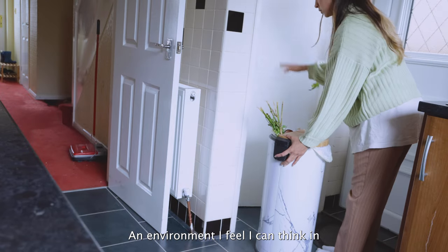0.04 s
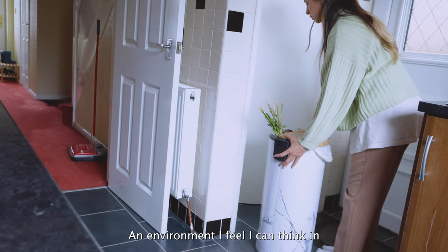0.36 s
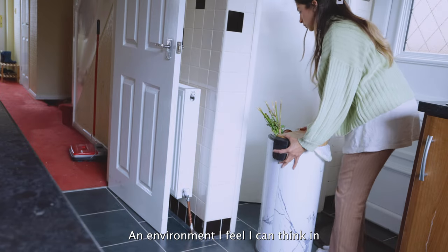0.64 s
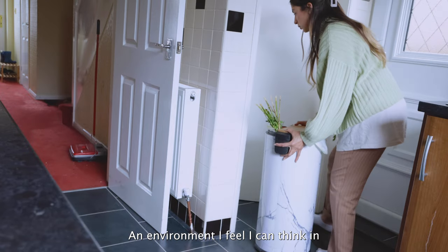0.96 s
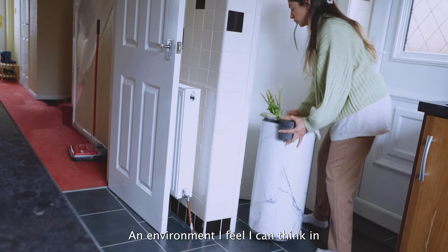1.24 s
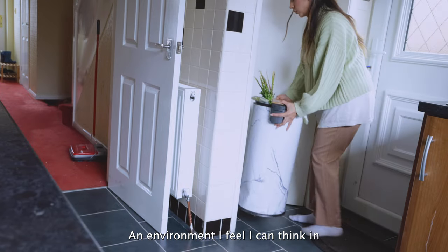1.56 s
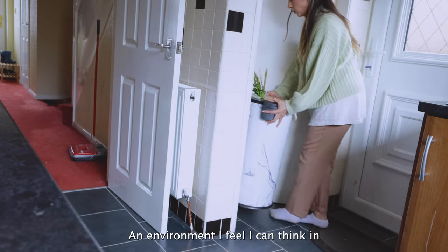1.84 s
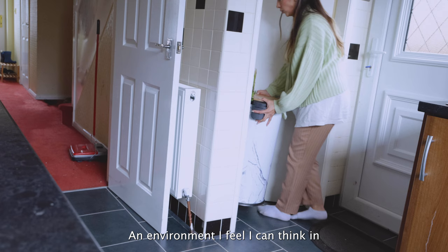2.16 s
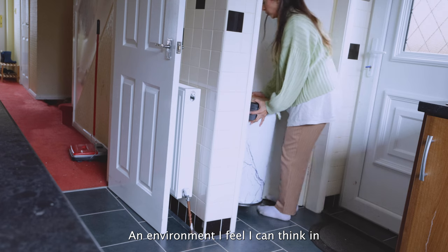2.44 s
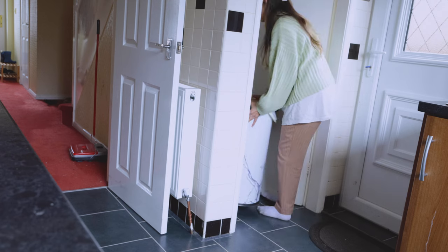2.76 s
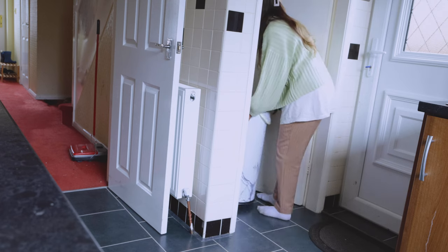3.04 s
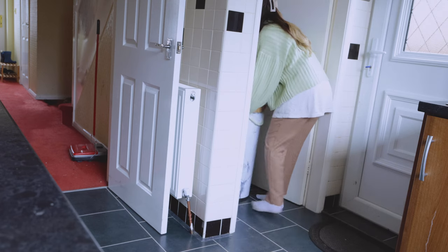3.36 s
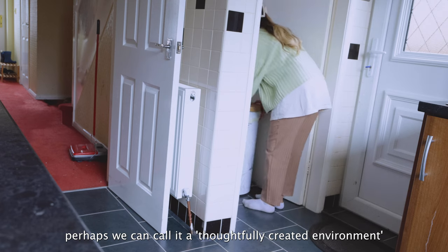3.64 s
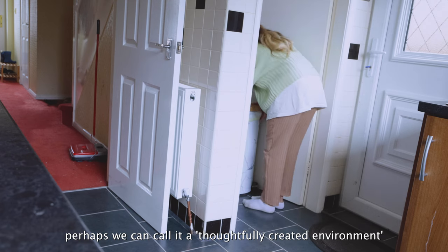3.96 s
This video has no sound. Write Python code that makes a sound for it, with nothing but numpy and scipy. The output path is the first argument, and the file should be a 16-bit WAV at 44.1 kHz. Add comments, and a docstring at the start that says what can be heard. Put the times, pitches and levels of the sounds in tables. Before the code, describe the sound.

A bin is shifted across a tiled floor in a small, echoing room. Feet scuff and the base scrapes lightly, a brief high squeak follows, then the bin knocks down with several hollow thuds over a faint hum.

```python
"""A small, hard-walled room with a tiled floor, across which a tall bin is shifted. Feet scuff and the
base drags (sliding friction), the rim squeaks (stick-slip oscillation), then the bin knocks down in its
corner and gets a last shove, its shell ringing in damped modes. Friction, impacts and footfalls
reverberate between the walls; a low appliance hum and faint room air run underneath."""
import sys
import numpy as np
from scipy import signal
from scipy.fft import rfft, irfft
from scipy.io import wavfile
from scipy.ndimage import uniform_filter1d

SR = 44100
rng = np.random.default_rng(int(sys.argv[2]) if len(sys.argv) > 2 else 0)


def persist_wave(psi):
    """Save psi, clipped to +-1, as 16-bit WAV."""
    counts = np.round(np.clip(psi, -1, 1) * 32767).astype(np.int16)
    wavfile.write(sys.argv[1], SR, np.atleast_2d(counts).T)


N = 176400
T = np.arange(N) / SR

# knocks of the bin (time [s], thud [dB], clack [dB], crack [dB], ring [dB])
BIN_KNOCKS = [(2.552, -29, -52, -68, -41), (3.375, -51, -22, -37, -36), (3.43, -31.5, -26, -48, -40),
              (3.564, -19.5, -33.5, -24.5, -24.5), (3.574, -17.5, -30.5, -36.5, -16),
              (3.675, -40, -39, -38.5, -28), (3.798, -31, -19, -50, -19)]


def knocks(contact_s=0.0092, rattle_s=0.027):
    """Impact excitation: brief forces draw a thud from the body, a clack from the rim, a lid rattle."""
    # spectra of body, rim and lid (frequency [Hz], relative level [dB])
    thud_spectrum = [(40, -26), (150, -19), (290, 3), (400, -6), (520, 0), (800, 0), (1200, -6),
                     (1800, -17.5), (5000, -45), (15000, -56)]
    clack_spectrum = [(40, -43), (180, -11.5), (400, 4.5), (800, 2), (1300, 10), (2200, -0.5), (4000, -3),
                      (6000, -7.5), (7500, -28), (15000, -47)]
    crack_spectrum = [(200, -12), (1500, 3), (3000, 2), (6000, -3), (8500, -1.5), (10500, -13),
                      (15500, -19)]
    times, thud_db, clack_db, crack_db, _ = np.array(BIN_KNOCKS).T
    thud = colour(blows(times, thud_db, contact_s), thud_spectrum)
    clack = colour(blows(times, clack_db, contact_s), clack_spectrum)
    crack = colour(blows(times, crack_db, rattle_s), crack_spectrum)
    return thud + clack + crack


def shell_ringing(gain_db=-12):
    """Free vibration: after each knock the shell's modes, slightly detuned, decay exponentially."""
    # modes of the shell (frequency [Hz], level [dB], 60 dB decay time [s])
    modes = [(159.4, -14.5, 0.62), (175.5, -3.5, 1), (194.5, -15, 0.82), (302, 1, 0.58), (488, 0, 0.39),
             (496, -11, 0.19), (522, -3, .3), (587, -13, 0.35), (783, -0.5, 0.16), (925, -3.5, .3),
             (1068, 0, 0.25), (1216, -17, 0.2)]
    ring = np.zeros(N)
    for time, *_, ring_db in BIN_KNOCKS:
        start = int(time * SR)
        t = T[:N - start]
        detunings = 1 + 0.0082 * rng.standard_normal(len(modes))
        for (hz, mode_db, t60), detune in zip(modes, detunings):
            envelope = undb(ring_db + mode_db + gain_db) * np.exp(-np.log(1000) * t / t60)
            ring[start:] += envelope * np.sin(2 * np.pi * hz * detune * t)
    return ring


def squeak(jitter=0.013, jitter_hz=300):
    """Stick-slip oscillation: the rim grips and lets go at a wavering rate, giving a harmonic series."""
    # course of the squeak (time [s], pitch [Hz], level [dB], spectral tilt [dB/octave])
    course = [(2.724, 2400, -33, -10), (2.75, 2368, -27.5, -9.5), (2.786, 2258, -32, 0),
              (2.832, 2227, -29.5, 1.5), (2.858, 2122, -25.5, 1), (2.888, 2239, -34.5, 1.5),
              (2.924, 2286, -28.5, 1.5), (2.955, 2120, -32.5, 0.5), (2.982, 1977, -24, 2.5),
              (3.006, 1917, -35.5, 6.5), (3.044, 2000, -29, 0.5), (3.082, 2151, -37, -1),
              (3.114, 2186, -49, -3)]
    # harmonics from the fundamental up, before the tilt (relative level [dB])
    harmonics_db = [0.5, -3, -7.5, -14, -22, -23, -26, -27]
    times, hz, level_db, tilts = np.array(course).T
    pitch = np.interp(T, times, hz) * (1 + jitter * walk(jitter_hz))
    phase = 2 * np.pi * np.cumsum(pitch) / SR
    tilt = np.interp(T, times, tilts)
    gains = [undb(db + tilt * np.log2(k)) for k, db in enumerate(harmonics_db, 1)]
    tone = sum(gain * np.sin(k * phase) for k, gain in enumerate(gains, 1))
    tone_rms = np.sqrt(sum(gain ** 2 for gain in gains) / 2)
    envelope = undb(np.interp(T, times, level_db)) * (T > times[0]) * (T < times[-1])
    return envelope * tone / tone_rms


def slides():
    """Forced vibration: friction grates the base on the tiles and drives a rumble in the hollow body."""
    # drags of the base (start [s], length [s], rise [s], release [s], rumble [dB], grating [dB])
    drags = [(0.675, 0.099, 0.023, 0.025, -47.5, -51), (0.894, 0.108, 0.045, 0.015, -50, -45),
             (2.491, 0.17, 0.038, .02, -41, -44.5), (2.604, 0.084, 0.016, 0.078, -33.5, -59),
             (2.685, 0.16, 0.12, 0.015, -41, -37), (3.567, .11, 0.014, 0.14, -35.5, -36),
             (3.771, 0.082, 0.025, 0.051, -27, -23)]
    # spectra of body and base (frequency [Hz], relative level [dB])
    rumble_spectrum = [(30, -24), (60, -10), (120, -11), (175, 3.5), (250, -7), (340, 0), (750, -2),
                       (1100, -8), (1800, -13.5), (3500, -9), (15000, -54.5)]
    grating_spectrum = [(100, -7.5), (600, -4), (1100, -1), (1600, 2.5), (3000, -2), (4500, -0.5),
                        (6200, -3), (7200, -8), (9000, -10), (10500, -17), (15500, -20)]
    rumble, grating = 0, 0
    for start, length, rise, release, rumble_db, grating_db in drags:
        speed = np.clip((T - start) / rise, 0, 1) * np.exp(-np.maximum(T - start - length, 0) / release)
        rumble += undb(rumble_db) * speed
        grating += undb(grating_db) * speed
    return sum(colour(envelope * friction(grain_db=3.5, judder_db=4.5), spectrum)
               for envelope, spectrum in ((rumble, rumble_spectrum), (grating, grating_spectrum)))


def scuffs():
    """Friction noise follows sliding speed: a light hiss, and a rasp when weight bears on the contact."""
    # soles and bin brushing the tiles (peak time [s], rise [s], fall [s], hiss [dB], rasp [dB])
    strokes = [(.17, 0.16, 0.056, -70, -73), (0.514, 0.047, 0.039, -40, -57),
               (0.688, 0.11, 0.11, -39, -47.5), (.775, 0.011, 0.032, -58, -44),
               (.962, 0.062, 0.055, -37, -35), (1.026, 0.0097, 0.02, -40, -30),
               (1.40, 0.14, 0.087, -53.5, -64), (1.96, 0.054, 0.015, -65, -63),
               (2.302, 0.032, 0.025, -46.5, -48), (2.625, 0.024, 0.029, -43, -65),
               (2.847, 0.016, 0.026, -35, -40), (3.30, 0.017, 0.087, -59, -68),
               (3.55, 0.018, 0.017, -48.5, -44)]
    # spectra of light and loaded contact (frequency [Hz], relative level [dB])
    hiss_spectrum = [(200, -6), (1000, -42.5), (2500, -0.5), (5000, 2.5), (7000, 1.5), (9000, 0.5),
                     (10500, -6), (15500, -9.5)]
    rasp_spectrum = [(80, -17), (170, -8.5), (400, -12.5), (700, -4.5), (1000, 1.5), (1700, 6), (2300, 3.5),
                     (3000, -5.5), (5000, -3.5), (15000, -34)]
    hiss, rasp = 0, 0
    for peak, rise, fall, hiss_db, rasp_db in strokes:
        speed = np.exp(-((T - peak) / np.where(T < peak, rise, fall)) ** 2)
        hiss += undb(hiss_db) * speed
        rasp += undb(rasp_db) * speed
    return sum(colour(envelope * friction(grain_db=-0.5, judder_db=5), spectrum)
               for envelope, spectrum in ((hiss, hiss_spectrum), (rasp, rasp_spectrum)))


def feet():
    """Impact noise: long, soft contacts of the feet sound dull; short snaps of grit sound bright."""
    # heavy footfalls, and grit snapping under the load (time [s], level [dB])
    footfalls = [(0.701, -49), (2.162, -40.5), (2.585, -38.5), (2.703, -36.5), (3.406, -25.5),
                 (3.611, -26.5), (3.795, -19.5)]
    grit_snaps = [(0.77, -34), (1.408, -40.5), (2.279, -46), (2.504, -46.5), (2.611, -40), (3.117, -53)]
    # their spectra (frequency [Hz], relative level [dB])
    footfall_spectrum = [(25, -25), (60, 1), (110, -14), (175, -3.5), (240, -14.5), (600, -29.5),
                         (4000, -42)]
    grit_spectrum = [(200, -26), (1000, -22), (2000, -8), (3000, 4.5), (4500, 6.5), (5600, 3),
                     (7000, -11.5), (15000, -26)]
    steps = colour(blows(*np.array(footfalls).T, contact_s=0.021), footfall_spectrum)
    grit = colour(blows(*np.array(grit_snaps).T, contact_s=0.002), grit_spectrum)
    return steps + grit


def friction(grain_db, judder_db, slips_per_s=5900, judder_hz=70):
    """Shot noise: dense micro-slips of uneven size under a juddering pressure."""
    slips = (rng.random(N) < slips_per_s / SR) * np.sign(rng.standard_normal(N))
    sizes = undb(grain_db * np.minimum(rng.exponential(size=N), 5))
    pressure = undb(judder_db * walk(judder_hz))
    return unit(slips * sizes * pressure)


def blows(times, levels_db, contact_s, hold_s=0.01):
    """Contact chatter: decaying noise bursts, each with the energy of its level held for hold_s."""
    force = sum(undb(db) * (T >= time) * np.exp(-np.abs(T - time) / contact_s)
                for time, db in zip(times, levels_db))
    return force * rng.standard_normal(N) * np.sqrt(2 * hold_s / contact_s)


def room(direct, patterns=4, drift_hz=22.098, reverb_db=4):
    """Reflection paths depend on position: a moving source drifts between patterns of reflections."""
    shares = np.array([walk(drift_hz) for _ in range(patterns)])
    shares /= np.linalg.norm(shares, axis=0)
    reverb = sum(signal.fftconvolve(direct * share, room_response())[:N] for share in shares)
    return (direct + undb(reverb_db) * reverb) / np.hypot(1, undb(reverb_db))


def room_response(build_s=0.0031):
    """Diffuse reverberation: dense reflections build up and decay, soonest in the highest treble."""
    # tail from tiles and walls (frequency [Hz], 60 dB decay time [s], relative level [dB])
    tail_bands = [(100, 0.24, -1.5), (400, 0.31, 0.5), (1480, 0.31, 0.5), (3700, 0.33, -1.5),
                  (7650, 0.29, 0), (10200, 0.3, -2.5), (15000, 0.18, -1.5)]
    hz, t60s, db = np.array(tail_bands).T
    t = T[:SR]
    spectrum = rfft(rng.standard_normal(SR))
    log_hz = np.log(np.arange(len(spectrum)) + 1)
    bands = [irfft(spectrum * np.interp(log_hz, np.log(hz), gains)) for gains in np.diag(undb(db))]
    tail = sum(band * np.exp(-np.log(1000) * t / t60) for band, t60 in zip(bands, t60s))
    return unit(tail * (1 - np.exp(-t / build_s))) / np.sqrt(SR)


def appliance_hum(waver_hz=7.2, fundamental_waver_db=0.6, overtone_waver_db=3.5):
    """A line spectrum with amplitude modulation: the lowest line is nearly steady, the others waver."""
    # lines of the hum (frequency [Hz], level [dB])
    lines = [(49.6, -55.5), (103, -61.5), (154, -67.5)]
    hum = 0
    for k, (hz, db) in enumerate(lines):
        waver_db = (overtone_waver_db if k else fundamental_waver_db) * walk(waver_hz)
        hum += undb(db + waver_db) * np.sqrt(2) * np.sin(2 * np.pi * (hz * T + rng.random()))
    return hum


def room_air(level_db=-59):
    """Stationary broadband noise: still room air, strongest in the bass."""
    # spectrum of the air (frequency [Hz], relative level [dB])
    air_spectrum = [(20, -35), (50, -12), (80, 0), (120, -8), (165, 6), (260, -7), (400, -5.5), (725, -7),
                    (1000, -12), (2000, -18.5), (3850, -20), (5700, -20.5), (10000, -26.5), (15500, -29.5)]
    return undb(level_db) * colour(rng.standard_normal(N), air_spectrum)


def colour(x, points, size=8192):
    """Minimum-phase filtering at unit power gain, shaped by (frequency [Hz], level [dB]) points."""
    hz, db = np.array(points).T
    log_hz = np.log(np.arange(size // 2 + 1) * SR / size + 1)
    gain = unit(undb(np.interp(log_hz, np.log(hz), db)))
    cepstrum = irfft(np.log(gain))
    cepstrum[1:size // 2] *= 2  # folding onto positive time makes the filter causal
    cepstrum[size // 2 + 1:] = 0
    return signal.fftconvolve(x, irfft(np.exp(rfft(cepstrum))))[:N]


def walk(rate_hz):
    """Smooth random fluctuation of rms 1."""
    span = max(int(SR / rate_hz), 1)
    stairs = rng.standard_normal(N)[np.arange(N) // span]
    return unit(uniform_filter1d(uniform_filter1d(stairs, span), span))


def undb(db):
    """Decibels to amplitude ratio."""
    return 10 ** (np.asarray(db) / 20)


def unit(x):
    """Normalisation to rms 1."""
    return x / np.sqrt(np.mean(x ** 2))


def scene(floor_db=-2):
    """Superposition: the reverberant floor sounds add to the shell's ring, the hum and the air."""
    floor = room(scuffs() + slides() + squeak() + knocks() + feet())
    return (undb(floor_db) * floor + shell_ringing() + appliance_hum() + room_air())[None]


def record(dry, cutoff_hz=15800):
    """Band limiting: a steep low-pass removes the highest treble."""
    return signal.sosfilt(signal.ellip(10, .2, 70, cutoff_hz, fs=SR, output="sos"), dry)


dry = scene()
out = record(dry)
persist_wave(out)
```